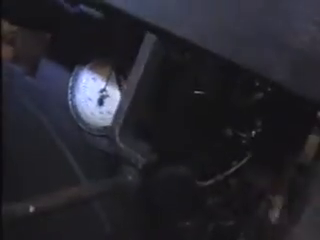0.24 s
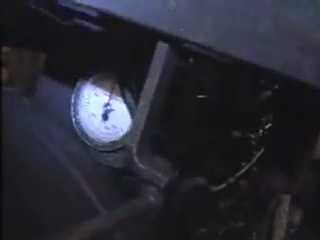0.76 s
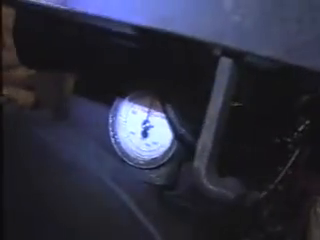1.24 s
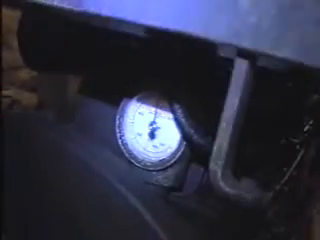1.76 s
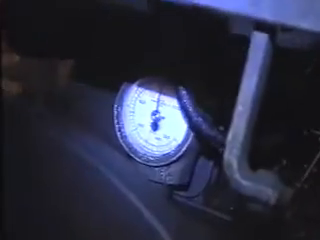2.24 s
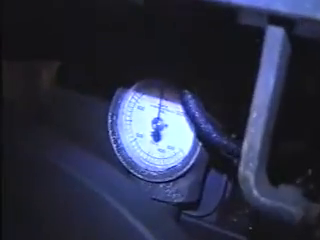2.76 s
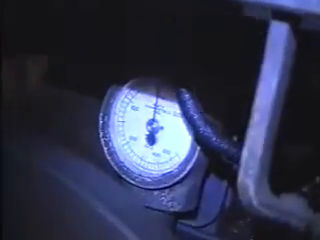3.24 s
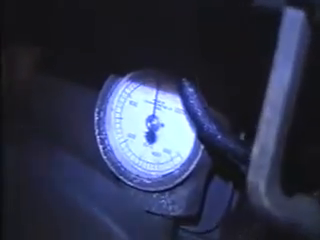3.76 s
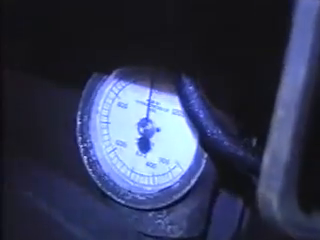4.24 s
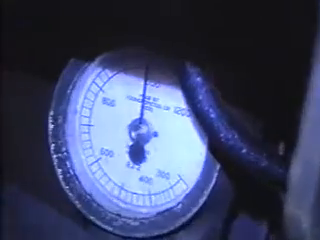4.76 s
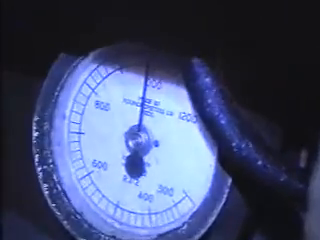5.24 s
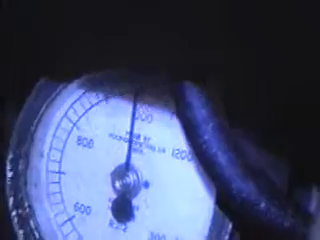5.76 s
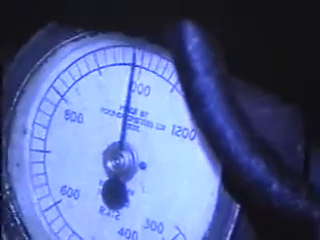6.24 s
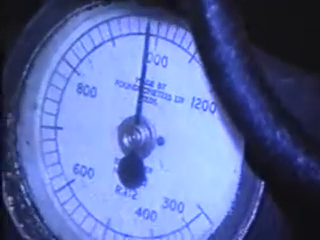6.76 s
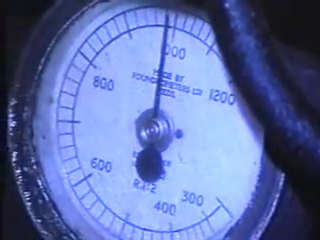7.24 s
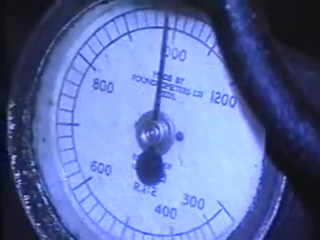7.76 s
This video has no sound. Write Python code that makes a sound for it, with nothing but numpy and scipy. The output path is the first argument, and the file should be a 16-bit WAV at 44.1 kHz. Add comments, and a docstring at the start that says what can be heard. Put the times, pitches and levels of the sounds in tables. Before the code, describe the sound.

From 0 to 8 seconds a large four-cylinder diesel engine runs without pause at constant speed, driving a generator in a hard-walled room. Its full cycle repeats roughly eight times a second, with many knocks per cycle blurring into a hard, chattering metallic drone. The strongest ringing tone sits near 700 hertz, with others around 365 and 500. Short valve and injector clanks, about 1300 to 2500 hertz, vary slightly in force each cycle, over resonant panel noise and bright rattle. The low-mid tone dips a little around 0.3 seconds, recovers by 1, then stays even. Faint generator and fan tones waver below; a weak 50-hertz hum with low rumble swells briefly every half second or so, longer after 1.6 seconds. The close microphone is dull, bass-light and softly compressed, with steady hiss and thin treble fizz. Nothing else happens, and it ends still running.

```python
"""A hard, clattering diesel drone: a large four-cylinder engine turns a generator in a hard-walled room.
Engine: one cycle (two crank turns) of tuned partials, looped at the crank angle; groups of them waver. Clatter:
panel-shaped noise, stepped at knocks and taps, plus a looped rattle; clanks are short sine rings. Free tones
ignore the crank; a 50 Hz hum and low rumble come and go, let through in spans. Pickup: dull, soft-limited
microphone, hiss; a jump in read time 600 times a second adds a fine treble fizz."""
import sys
import numpy as np
from scipy import signal
from scipy.fft import rfft, irfft, next_fast_len
from scipy.io import wavfile
from scipy.ndimage import uniform_filter1d, map_coordinates

SR = 44100
rng = np.random.default_rng(int(sys.argv[2]) if len(sys.argv) > 2 else 0)


def transcribe(signal):
    """Save signal, clipped to [-1, 1], as a 16-bit WAV file at the path in sys.argv[1]."""
    frames = np.atleast_2d(signal).T
    limited = np.clip(frames, -1, 1)
    pcm = np.round(limited * 32767).astype(np.int16)
    wavfile.write(sys.argv[1], SR, pcm)


N = 352359
T = np.arange(N) / SR

# crank lead over an even beat, as the governor hunts: time_s, lead_ms
CRANK_LEAD = [(0, .44), (.9, 1.1), (2, 1.2), (2.8, 1.13), (3.6, 1.31), (5.1, 1.39), (5.6, .98), (6.6, .83),
              (7.2, 1.07), (7.6, 1.48), (8, 1.63)]
# blows in one cycle, used for partial phases only: crank_deg, level_db, hardness_db_per_octave
ENGINE_BLOWS = [(27.5, -3.8, -6.6), (64.4, -15.9, 12.2), (90.8, 4.0, -3.0), (94.2, -16.0, -4.0),
                (98.2, -4.2, 10.7), (128.9, -9.8, 16.0), (146.5, 7.1, 3.0), (161.6, -15.9, 16.0),
                (197.5, -16.0, -10.0), (212.5, 2.1, 1.5), (218.9, 0.8, -7.7), (236.4, 5.8, -1.9),
                (277.0, -13.3, 10.6), (289.1, -15.6, 10.8), (299.3, 5.2, 8.0), (316.5, -13.7, 1.6),
                (317.9, -2.7, 10.7), (326.6, 0.5, 3.5), (329.8, -16.0, -10.1), (342.6, -16.0, -4.0),
                (359.4, -8.0, -6.5), (368.8, 3.0, 1.8), (389.2, -5.2, 5.0), (407.4, -16.0, -10.0),
                (504.4, -4.0, -6.9), (541.9, 8.4, 9.8), (544.3, -16.0, -10.0), (567.9, 7.5, 0.9),
                (597.1, 6.5, -3.9), (624.2, 3.1, -4.7), (676.2, 2.1, 8.6), (680.7, 7.6, 4.7),
                (683.1, -1.4, 8.5)]
# engine block modes, used for partial phases only: mode_hz, level_db, t60_s
BLOCK_MODES = [(61.9, 6.0, 0.7), (86.5, -27.3, 0.211), (224.6, -36.3, 0.7), (237.0, -48.3, 0.7),
               (260.9, -46.5, 0.7), (299.0, -34.5, 0.534), (306.8, -35.2, 0.565), (329.1, -45.0, 0.7),
               (368.7, -24.5, 0.7), (457.2, -28.7, 0.7), (549.9, -14.1, 0.7), (595.4, -15.0, 0.591),
               (689.5, -42.5, 0.672), (762.4, -32.4, 0.7), (880.0, -32.8, 0.372), (904.6, -35.9, 0.7),
               (1107.9, -43.7, 0.066), (1211.7, -32.7, 0.7), (1542.1, -38.6, 0.7), (1613.9, -21.8, 0.7),
               (2319.4, -9.1, 0.02), (3468.1, -17.1, 0.02)]
# ordinary partials, smooth curve before scatter: freq_hz, level_db_rms
PARTIAL_CURVE = [(100, -76), (223, -60), (306, -56), (472, -55), (555, -56), (720, -54), (804, -56),
                 (887, -54), (970, -56), (1053, -58), (1136, -55), (1300, -57), (1468, -62), (1634, -67),
                 (1800, -71), (1999, -73)]
# partials that stand out as engine tones: cycle_multiple, level_db_rms
ENGINE_TONES = [(12, -65), (15, -60), (17, -62), (21, -57), (26, -51), (28, -50), (30, -49), (31, -48),
                (32, -50), (33, -49), (39, -49), (40, -49), (41, -51), (43, -42), (44, -37), (45, -47),
                (46, -47), (47, -48), (48, -45), (50, -49), (51, -47), (53, -50), (54, -49), (55, -47),
                (56, -44), (57, -44), (59, -41), (60, -43), (61, -41), (62, -37), (64, -49), (66, -44),
                (68, -48), (69, -42), (70, -47), (71, -47), (72, -45), (73, -44), (74, -45), (75, -38),
                (76, -48), (77, -49), (78, -49), (79, -46), (80, -39), (81, -46), (82, -51), (83, -45),
                (84, -29.5), (85, -50), (86, -37), (87, -47), (88, -40), (89, -48), (90, -41), (91, -48),
                (92, -46), (93, -46), (96, -43), (98, -46), (99, -46), (100, -47), (101, -43), (102, -50),
                (103, -46), (104, -43), (105, -47), (106, -43), (107, -47), (108, -50), (109, -43),
                (110, -43), (111, -47), (113, -45), (114, -43), (115, -51), (118, -46), (120, -49),
                (121, -47), (126, -51), (130, -51), (131, -51), (132, -49), (133, -50), (134, -50),
                (135, -48), (138, -48), (140, -50), (142, -50), (143, -45), (146, -48), (148, -45),
                (149, -48), (150, -44), (154, -52), (160, -47), (161, -51), (162, -50), (166, -51),
                (168, -45), (170, -52), (174, -52), (180, -47), (184, -54), (191, -54), (192, -56),
                (193, -54), (200, -51), (208, -59), (211, -59), (213, -57), (221, -59), (225, -60),
                (232, -58)]
# gain of the partial group around one low tone: time_s, gain_db
LOW_GROUP_GAIN = [(0, -1), (.3, -4), (.9, -0.5), (1.1, 0.4), (7, 0.5), (8, 1)]
# clatter noise density before panels: freq_hz, density_db_per_hz
CLATTER_DENSITY = [(80, -108), (110, -78), (190, -67.5), (260, -62.5), (365, -63.5), (440, -63.5),
                   (560, -61), (720, -63), (785, -63.5), (880, -60.5), (970, -61.5), (1050, -63.5),
                   (1300, -66), (2050, -70), (2500, -72.5), (3700, -74.5)]
# panel and pipe resonances in the clatter: freq_hz, width_hz, boost_db
PANEL_RESONANCES = [(278, 16, 4), (355.4, 7.2, 6.5), (486, 10, 6.5), (526, 11, -1.5), (634, 21, 4),
                    (694.5, 16, 7), (714, 7.2, 9.5), (751, 14, 8.5), (816, 22, 6.5), (891, 22, 5),
                    (904, 7.3, 6), (1126, 40, 4), (1230, 24, 6.5), (1365, 30, 4), (1385, 15, 5),
                    (1474, 17, 7), (1727, 24, 3)]
# looped bright rattle: freq_hz, density_db_per_hz
RATTLE_DENSITY = [(1900, -110), (2050, -81), (2500, -81), (3000, -84), (3700, -91)]
# steps in mid clatter, before scatter and rms scaling: crank_deg, level_db
MID_KNOCKS = [(15, 2), (133, 4), (218, 1), (270, 2.5), (315, -2), (350, -1), (385, 5.5), (435, 2),
              (475, 2.5), (505, 1.5), (525, 1.5), (545, -2), (575, 2.5), (632, 3)]
# steps in bright clatter, before scatter and rms scaling: crank_deg, level_db
BRIGHT_TAPS = [(78, 6.5), (135, 4), (262, -2.5), (302, 5.5), (322, 2.5), (352, 4.5), (390, 1), (478, -0.5),
               (515, 5.5), (545, 1), (632, -0.5), (665, 3.5), (698, 2)]
# valve and injector clanks, envelope peak before scatter: crank_deg, pitch_hz, peak_db
VALVE_CLANKS = [(3, 1750, -36.5), (42, 1700, -36), (91.6, 2100, -38), (120, 2100, -37.5),
                (135.7, 1600, -34.5), (175, 1750, -34), (206, 2200, -34.5), (220, 1600, -33.5),
                (246, 1800, -35), (268, 1300, -31.5), (313, 2100, -33.5), (350, 1750, -33.5),
                (390.5, 1350, -33), (453, 1750, -34.5), (488, 1800, -35.5), (563, 1300, -30.5),
                (562, 2200, -41), (595, 2500, -41), (614, 1700, -37.5), (632, 2250, -34),
                (700, 2250, -36.5)]
# generator and fan tones before waver: pitch_hz, level_db_rms
GENERATOR_TONES = [(202.2, -57), (220.9, -55), (303.3, -55), (392, -45), (402.9, -52)]
# spans where the read-time jumps keep their beat: start_s, end_s, beat_phase_cycles
LOCKED_SPANS = [(0, .68, .21), (1.68, 5.74, .92)]
# spans where the hum is heard, before waver: start_s, length_s, level_db_rms
HUM_SPANS = [(0.034, 0.052, -60), (0.349, 0.094, -53), (0.942, 0.138, -55), (1.327, 0.084, -64),
             (1.598, 0.3, -52), (2.252, 0.29, -53), (2.816, 0.37, -50), (3.56, 0.35, -54),
             (4.248, 0.23, -56), (4.907, 0.23, -57), (5.46, 0.45, -56), (5.998, 0.55, -55),
             (6.75, 0.41, -56), (7.361, 0.37, -54)]

CYCLE_HZ, CYCLE_DEG = 8.296, 720  # four-stroke cycle
FLUTTER_MS, FLUTTER_RATE_HZ = .03, 5.
LOWEST_ORDER, HIGHEST_ORDER = 12, 241  # multiples of CYCLE_HZ
PARTIAL_SCATTER_DB, LOW_GROUP_ORDER = 2.5, 44
SURGE_DB, SURGE_DEG = .5, 560  # once a cycle, loudest at this angle


def undb(db):
    """Amplitude ratio from decibels."""
    return 10 ** (np.asarray(db) / 20)


def walk(rate_hz):
    """Random levels held 1 / rate_hz s and smoothed twice; spread near 1."""
    hold = int(SR / rate_hz)
    steps = np.repeat(rng.standard_normal(N // hold + 1), hold)
    return 1.3 * uniform_filter1d(uniform_filter1d(steps, hold), hold)[:N]


def crank():
    """Cycles turned since the start: a steady rate with slow hunting and slight tremble."""
    lead_ms = np.interp(T, *np.transpose(CRANK_LEAD))
    flutter_ms = FLUTTER_MS * walk(FLUTTER_RATE_HZ)
    return CYCLE_HZ * (T + (lead_ms + flutter_ms) / 1000)


def loop(wave, cycles):
    """Reads one cycle's wave at the crank's place."""
    return np.interp(cycles % 1 * len(wave), np.arange(len(wave) + 1), np.r_[wave, wave[0]])


def partial_db(order):
    """Ordinary partials scatter about a smooth curve; engine tones take their own levels."""
    hz, db = np.transpose(PARTIAL_CURVE)
    level_db = np.interp(np.log(order * CYCLE_HZ), np.log(hz), db)
    level_db = level_db + PARTIAL_SCATTER_DB * rng.standard_normal(len(order))
    for multiple, tone_db in ENGINE_TONES:
        level_db[order == multiple] = tone_db
    return level_db


def one_cycle(size=8192):
    """Cycle spectrum: blows and block modes set the phases, partial_db sets the strengths."""
    order = np.arange(LOWEST_ORDER, HIGHEST_ORDER + 1)
    hz = order * CYCLE_HZ
    angle_deg, blow_db, hardness = np.transpose(ENGINE_BLOWS)[:, :, None]
    force = undb(blow_db + hardness * np.log2(hz / 700))
    blows = np.sum(force * np.exp(-2j * np.pi * order * angle_deg / CYCLE_DEG), 0)
    mode_hz, mode_db, t60_s = np.transpose(BLOCK_MODES)[:, :, None]
    w = 2 * np.pi * mode_hz
    decay = np.log(1000) / t60_s
    ring = np.sum(undb(mode_db) * w / ((2j * np.pi * hz + decay) ** 2 + w ** 2), 0)
    phase = np.angle(blows * ring)
    spectrum = np.zeros(size // 2 + 1, complex)
    spectrum[order] = undb(partial_db(order)) * np.exp(1j * phase) * size / np.sqrt(2)
    return spectrum


def engine(cycles, waver_db=.6, waver_rate_hz=45.):
    """Repeats the cycle; each fifth-octave group of partials wavers on its own."""
    spectrum = one_cycle()
    group = np.round(5 * np.log2(np.arange(len(spectrum)) + 1))
    low_db = np.interp(T, *np.transpose(LOW_GROUP_GAIN))
    out = np.zeros(N)
    for g in np.unique(group[spectrum != 0]):
        gain_db = waver_db * walk(waver_rate_hz) + low_db * (g == group[LOW_GROUP_ORDER])
        out += undb(gain_db) * loop(irfft(spectrum * (group == g)), cycles)
    return out


def coloured(table, size, rate_hz):
    """Noise spectrum shaped by a density table, and its bin frequencies."""
    hz = np.arange(size // 2 + 1) * rate_hz / size + 1  # +1 avoids log(0)
    at_hz, db = np.transpose(table)
    shape = undb(np.interp(np.log(hz), np.log(at_hz), db))
    return rfft(rng.standard_normal(size)) * shape * np.sqrt(rate_hz / 2), hz


def strike_scatter(cycles, table):
    """Random unit-spread value for each cycle and table row."""
    return rng.standard_normal((int(cycles[-1]) + 2, len(table)))


def struck(cycles, table, fade_deg, scatter_db):
    """Gain stepped up or down at each crank angle, relaxing over fade_deg; rms 1."""
    gate = np.ones(N)
    scatter = strike_scatter(cycles, table)
    for k, (angle_deg, db) in enumerate(table):
        since = cycles - angle_deg / CYCLE_DEG
        strike = np.floor(since).astype(int) + 1
        force = (undb(db) - 1) * undb(scatter_db * scatter[strike, k])
        gate += force * np.exp(-(since % 1) * CYCLE_DEG / fade_deg)
    return gate / np.sqrt(np.mean(gate ** 2))


def clatter(cycles, middle_hz=450., bright_hz=2400.):
    """Noise through panel resonances: steady lows, knocked mids with rattle, tapped gritty highs."""
    size = next_fast_len(N)
    noise, hz = coloured(CLATTER_DENSITY, size, SR)
    panel_db = sum(db / (1 + (2 * (hz - at_hz) / width_hz) ** 2)
                   for at_hz, width_hz, db in PANEL_RESONANCES)
    noise = noise * undb(panel_db)
    low_share = 1 / (1 + (hz / middle_hz) ** 4)
    high_share = 1 / (1 + (bright_hz / hz) ** 6)
    shares = (low_share, 1 - low_share - high_share, high_share)
    low, middle, high = (irfft(noise * share, size)[:N] for share in shares)
    rattle_spectrum, _ = coloured(RATTLE_DENSITY, 8192, 8192 * CYCLE_HZ)
    rattle = loop(irfft(rattle_spectrum), cycles)
    knocks = struck(cycles, MID_KNOCKS, fade_deg=9.1, scatter_db=1.8)
    taps = struck(cycles, BRIGHT_TAPS, fade_deg=14., scatter_db=2.0)
    grit = undb(1.84 * walk(900.))  # fast roughness
    grit = grit / np.sqrt(np.mean(grit ** 2))
    return low + knocks * (middle + rattle) + taps * grit * high


def clanks(cycles, rise_s=.00046, fade_s=.0014, scatter_db=2):
    """Short metallic sine rings at set crank angles; force varies from cycle to cycle."""
    out = np.zeros(N)
    scatter = strike_scatter(cycles, VALVE_CLANKS)
    for k, (angle_deg, pitch_hz, peak_db) in enumerate(VALVE_CLANKS):
        since = cycles - angle_deg / CYCLE_DEG
        since_s = since % 1 / CYCLE_HZ
        strike = np.floor(since).astype(int) + 1
        force = undb(peak_db + scatter_db * scatter[strike, k])
        shape = (1 - np.exp(-since_s / rise_s)) ** 2 * np.exp(-since_s / fade_s)
        out += force * shape / shape.max() * np.sin(2 * np.pi * pitch_hz * since_s)
    return out


def free_tones(waver_db=4, drift_rad=.69):
    """Generator and fan sines, wavering slowly in strength and phase."""
    out = np.zeros(N)
    for pitch_hz, level_db in GENERATOR_TONES:
        gain = undb(level_db + waver_db * walk(3.7)) * np.sqrt(2)
        out += gain * np.sin(2 * np.pi * pitch_hz * T + drift_rad * walk(3.))
    return out


def hum(pitch_hz=50., edge_s=.05, floor_db=-84, waver_db=9):
    """50 Hz sine heard only in spans; band noise just above it rises within each span."""
    hum_db, swell = floor_db, 0
    for start_s, length_s, level_db in HUM_SPANS:
        inside_s = np.minimum(T - start_s, start_s + length_s - T)
        up = np.clip(inside_s / edge_s + .5, 0, 1)
        hum_db = hum_db + up * (level_db - floor_db)
        swell = swell + up
    hum_db = hum_db + waver_db * np.minimum(walk(13.), 0)  # dips only
    tone = np.sqrt(2) * np.sin(2 * np.pi * pitch_hz * T)
    band = signal.butter(2, [58, 105], "band", fs=SR, output="sos")
    rumble = signal.sosfilt(band, rng.standard_normal(N))
    rumble_db = -62 - 13 * (1 - swell) + 3.5 * walk(14.)
    return undb(hum_db) * tone + undb(rumble_db) * rumble / rumble.std()


def jump_read_time(x, jump_hz=600.02, frame_s=.04, slip_samples=.73):
    """Read point jumps back by slip_samples, then catches up before the next jump: treble fizz."""
    frame = (T / frame_s).astype(int)
    phase = rng.random(frame[-1] + 1)[frame]  # new beat phase every frame outside locked spans
    for start_s, end_s, locked_phase in LOCKED_SPANS:
        phase[(T >= start_s) & (T < end_s)] = locked_phase
    late_samples = slip_samples * (.5 - (jump_hz * T + phase) % 1)
    return map_coordinates(x, [np.arange(N) - late_samples], order=3, mode="nearest")


def hiss(drive_db=-54, top_hz=5600.):
    """Band-passed white noise, flickering a little; drive_db is the level before the band-pass."""
    band = signal.butter(2, [300., top_hz], "band", fs=SR, output="sos")
    noise = signal.sosfilt(band, rng.standard_normal(N))
    return undb(drive_db + 1.3 * walk(22.)) * noise


def scene():
    """Engine and clatter surge together once a cycle; clanks and free tones do not."""
    cycles = crank()
    surge = undb(SURGE_DB * np.cos(2 * np.pi * (cycles - SURGE_DEG / CYCLE_DEG)))
    return (surge * (engine(cycles) + clatter(cycles)) + clanks(cycles) + free_tones())[None]


def record(dry):
    """Soft-limited dull microphone, read-time jumps, bass cut, hum, hiss, top cut, constant offset."""
    gain_db, ceiling, offset = .9, .36, .028
    mic_top_hz, bass_cut_hz, top_hz = 3719, 60., 11900
    rounded = ceiling * np.tanh(undb(gain_db) * dry[0] / ceiling)
    mic = signal.ellip(6, .5, 50, mic_top_hz, fs=SR, output="sos")
    bass_cut = signal.butter(2, bass_cut_hz, "high", fs=SR, output="sos")
    top_cut = signal.ellip(10, .2, 80, top_hz, fs=SR, output="sos")
    out = jump_read_time(signal.sosfilt(mic, rounded))
    out = signal.sosfilt(bass_cut, out) + hum() + hiss()
    return (signal.sosfilt(top_cut, out) + offset)[None]


dry = scene()
out = record(dry)
transcribe(out)
```